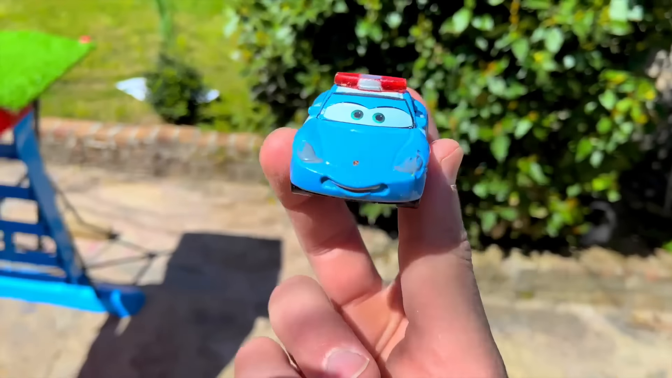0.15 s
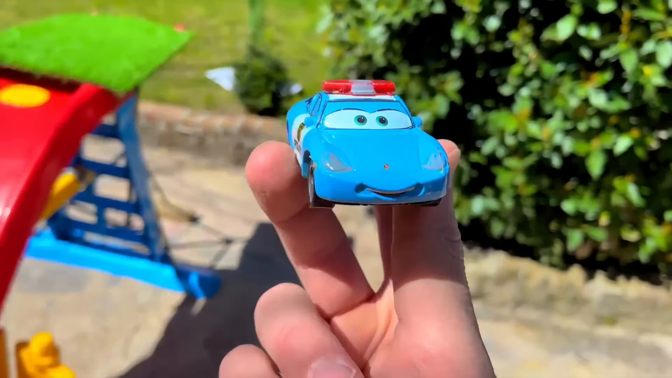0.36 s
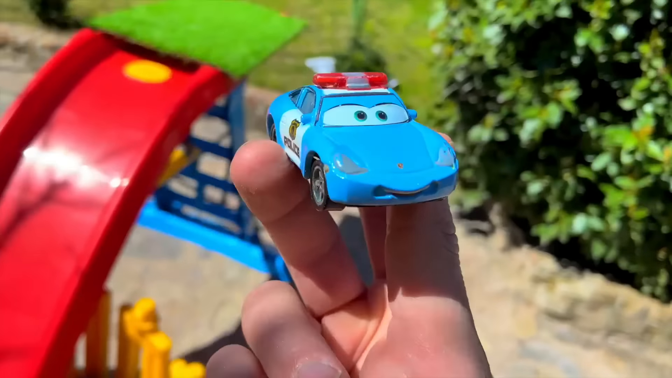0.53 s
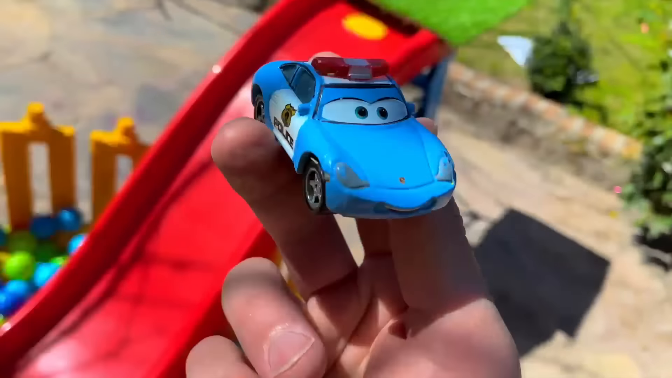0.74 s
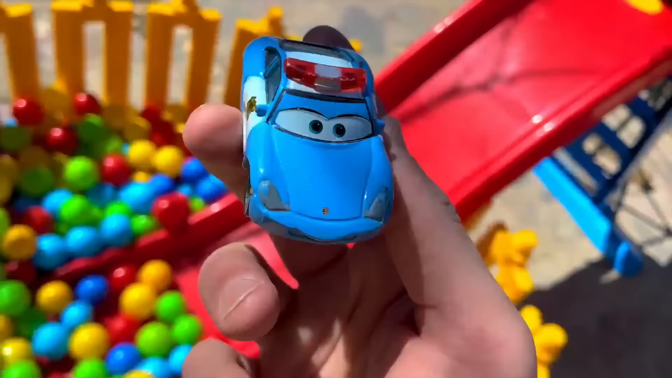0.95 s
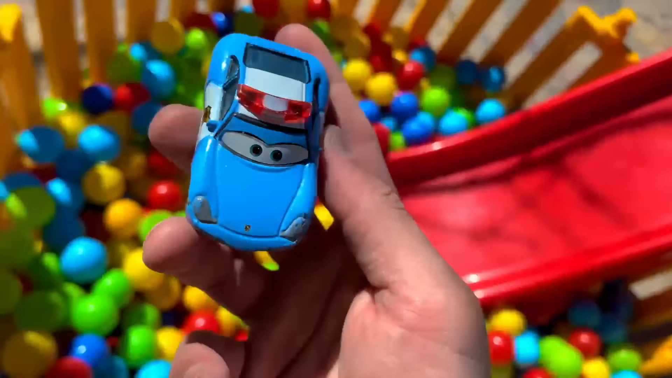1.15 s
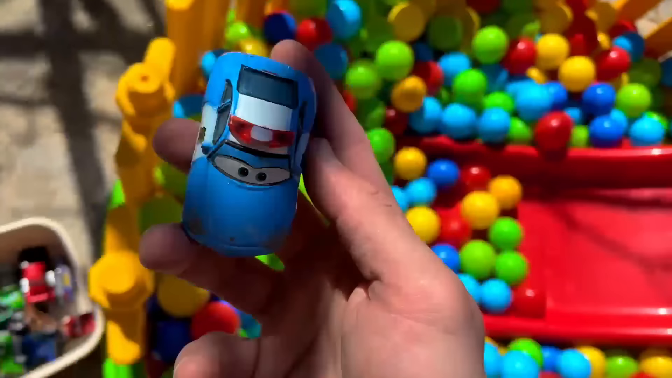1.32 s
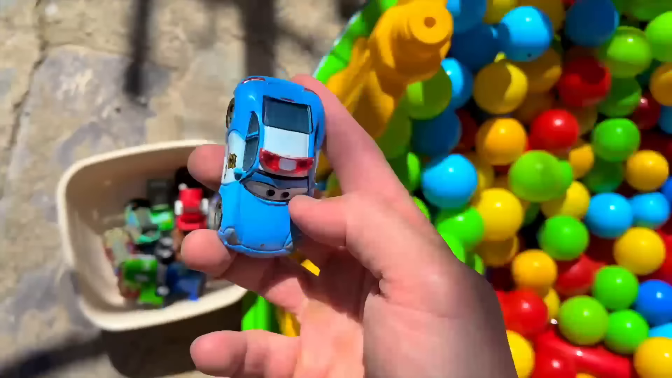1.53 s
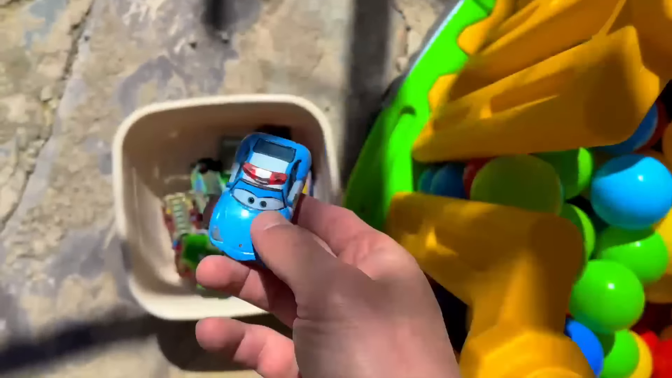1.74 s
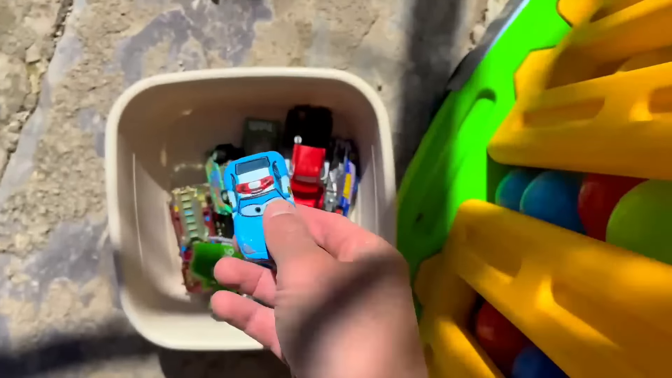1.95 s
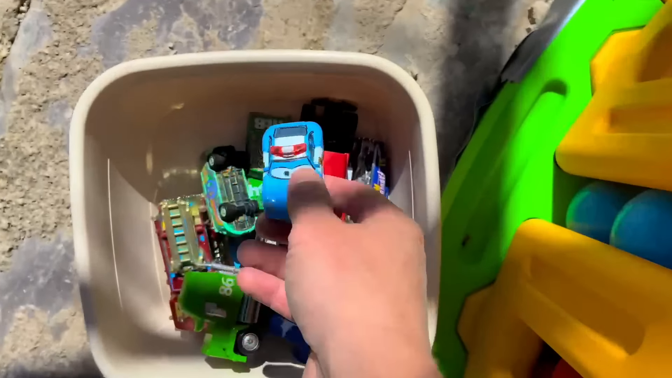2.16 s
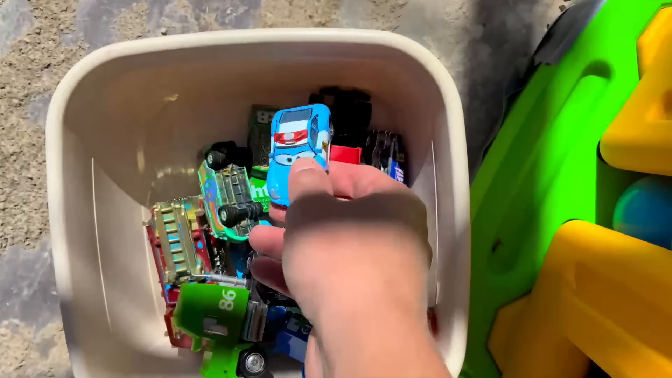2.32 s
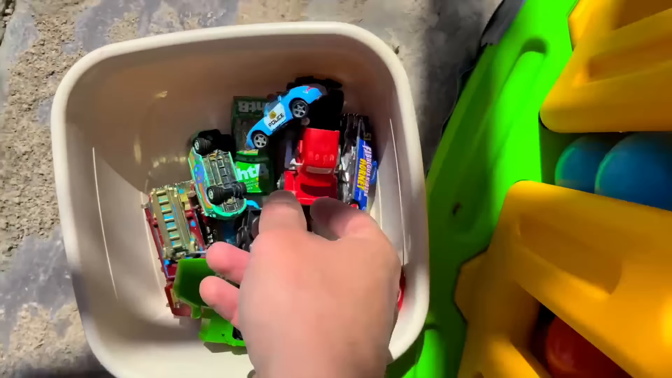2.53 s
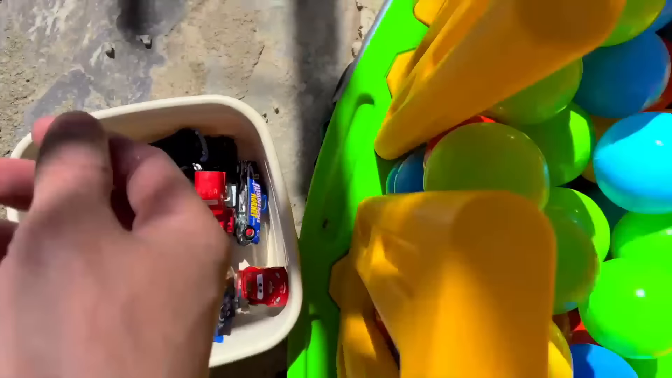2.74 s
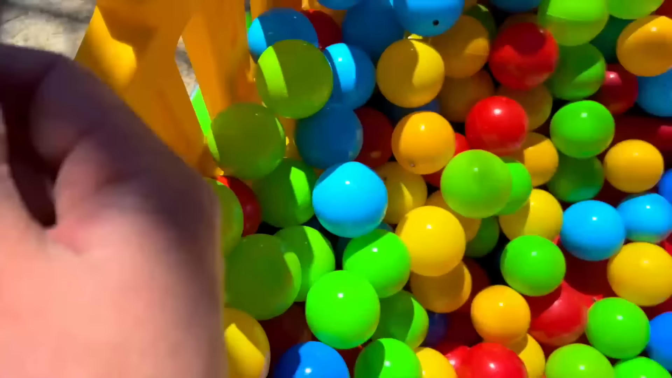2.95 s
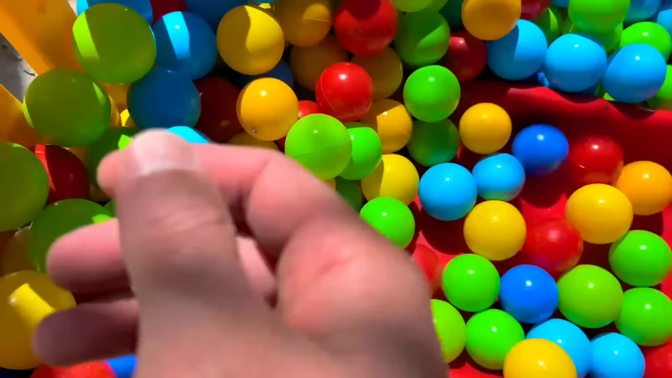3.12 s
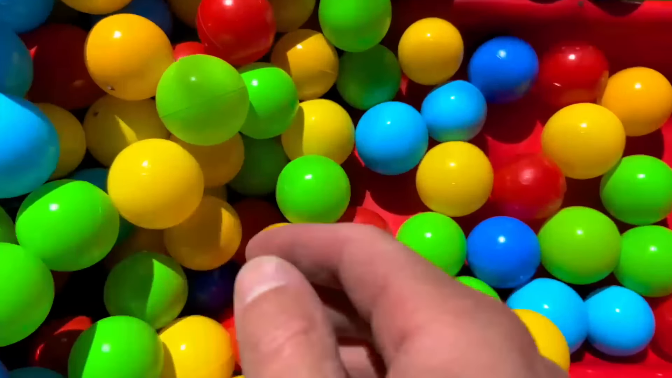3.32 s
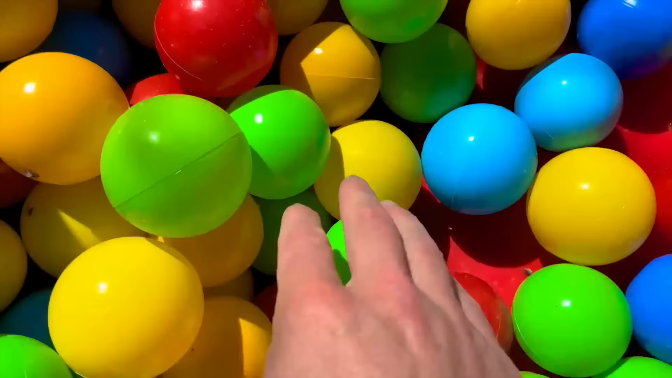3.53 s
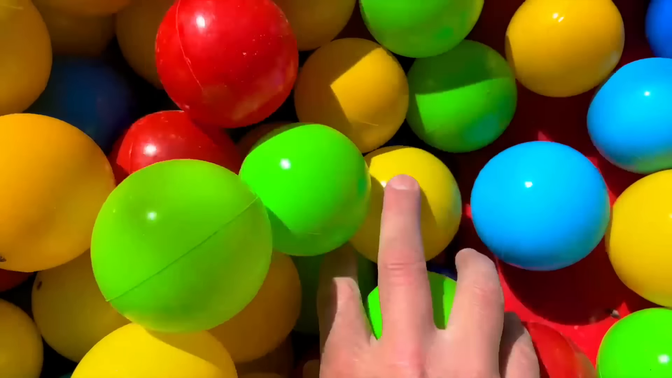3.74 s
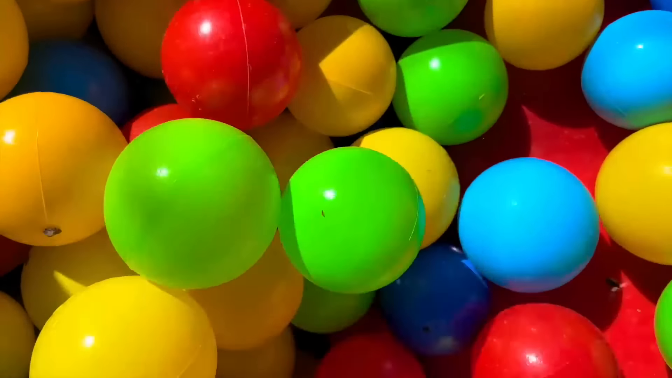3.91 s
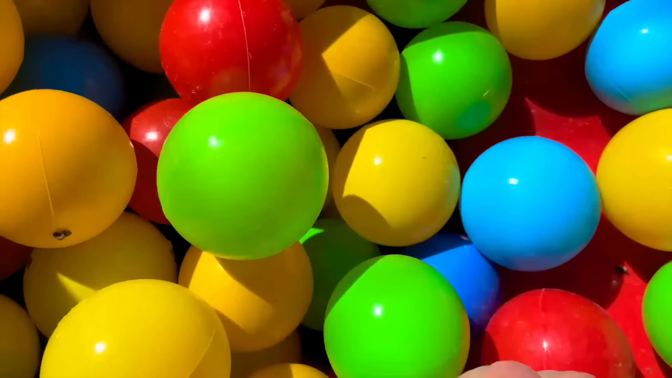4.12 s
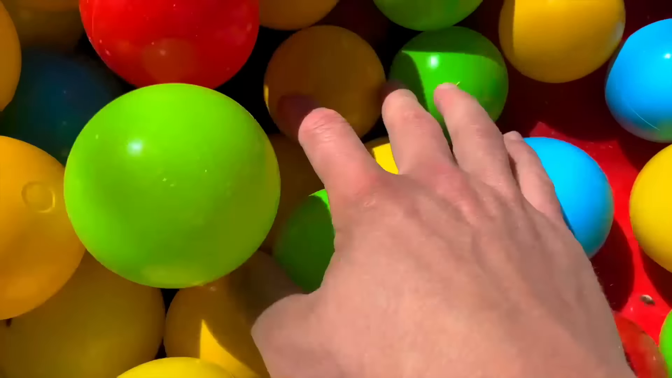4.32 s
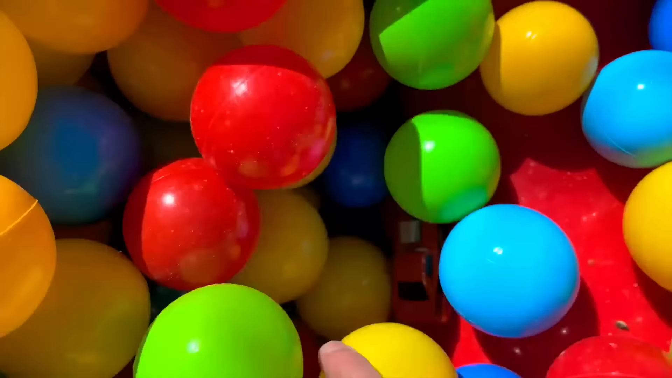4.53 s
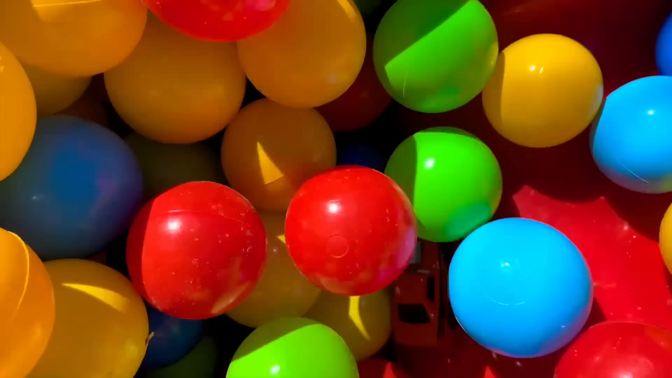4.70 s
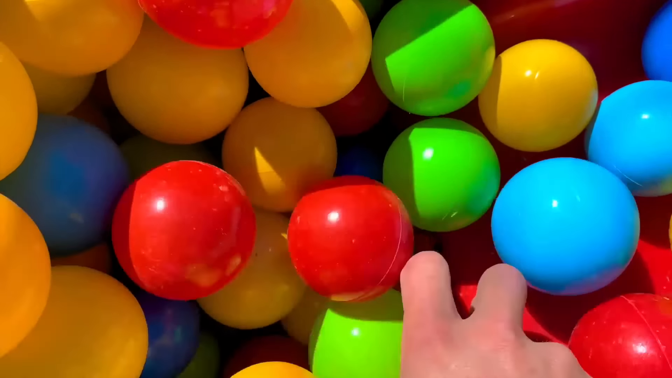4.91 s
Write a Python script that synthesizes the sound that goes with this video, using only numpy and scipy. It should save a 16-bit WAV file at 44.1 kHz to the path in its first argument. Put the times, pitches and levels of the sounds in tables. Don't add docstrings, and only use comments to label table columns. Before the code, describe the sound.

Nearly quiet yard with faint distant hum, wind rumble and light scuffs. Small metal cars click and clatter dryly in a tub for half a second, a hollow plastic panel thuds and shudders, then lightweight balls bump and squeak-rub busily under a hand. Close stereo phone microphones, short dry outdoor reflections, no lasting reverberation.

```python
import sys
import numpy as np
from scipy import signal
from scipy.fft import rfft, irfft, next_fast_len
from scipy.io import wavfile

SR = 44100
rng = np.random.default_rng(int(sys.argv[2]) if len(sys.argv) > 2 else 0)


def wav_out(sig):
    wavfile.write(sys.argv[1], SR, np.round(np.clip(np.atleast_2d(sig).T, -1, 1) * 32767).astype(np.int16))


def ratio_of_db(decibels):
    return 10 ** (np.asarray(decibels, float) / 20)


N = 223542

# (frequency [Hz], level [dB], t60 [s])
CAR_MODES = [(1320, 6.5, 0.06), (1714, 3.5, .045), (2240, 1, 0.081), (2470, -6.5, .035), (2990, -16.5, .04),
             (3284, -14.5, .04), (3662, -6, 0.055), (4044, -14, 0.033), (4500, -18.5, 0.038),
             (4600, -14, .03), (5800, -10.5, .02), (6094, -8.5, 0.055), (6580, -12, .025)]
# (frequency [Hz], level [dB], t60 [s])
TUB_MODES = [(258, 5.5, 0.065), (337, 13.5, 0.019), (474, 2.5, 0.041), (546, 1, 0.062), (620, -3.5, 0.04),
             (750, -14, 0.011), (980, -8, 0.034)]
# (frequency [Hz], density [dB per Hz])
CRACK_SPECTRUM = [(500, -14.5), (900, -16), (2200, -3), (3600, -8.5), (6000, -5), (9000, -5), (13000, -30),
                  (16000, -20.5)]
# (frequency [Hz], density [dB per Hz])
KNOCK_SPECTRUM = [(180, -29), (300, 4.5), (500, -1.5), (921, -5.5), (1320, -7.5), (3060, -16.5),
                  (4500, -42), (9900, -120)]
# (frequency [Hz], density [dB per Hz])
RUB_SPECTRUM = [(1800, -8.5), (3000, -6), (5000, -13.5), (8000, -10.5), (11000, -17.5), (14000, -16),
                (15900, -16.5), (16900, -45)]


def evened(x):
    return x / np.sqrt(np.mean(x ** 2) + 1e-20)


def peaked(x):
    return x / np.max(abs(x))


def read(points, hz):
    f, value = np.transpose(points)
    return np.interp(np.log(hz + 1), np.log(f + 1), value)


def coloured(x, points):
    size = next_fast_len(len(x))
    gain = ratio_of_db(read(points, np.fft.rfftfreq(size, 1 / SR)))
    return irfft(rfft(x, size) * gain, size)[:len(x)]


def add(mix, s, sound):
    part = mix[round(s * SR):][:len(sound)]
    part += sound[:len(part)]


def ring(modes, t):
    return sum(ratio_of_db(db - 60 * t / min(t60, .15)) * np.sin(2 * np.pi * hz * t) for hz, db, t60 in modes)


def sparse(per_s, spread_db):
    size = ratio_of_db(spread_db * np.minimum(rng.exponential(1, N), 4))
    size = size * rng.choice([-1., 1.], N)
    return size * (rng.random(N) < per_s / SR)


def strokes(rows, rise_db, fall_db):
    start, length, *levels = np.transpose(rows)[:, :, None]
    t = np.arange(0, N / SR + .001, .001)
    early = np.maximum(start - t, 0)
    late = np.maximum(t - start - length, 0)
    shape = ratio_of_db(-2 * rise_db * early - 2 * fall_db * late)
    return (np.interp(np.arange(N) / SR, t, np.sqrt((ratio_of_db(2 * db) * shape).sum(0))) for db in levels)


def contact(modes, thud_db, bright_db, t60, draw):
    t = np.arange(draw.shape[1]) / SR
    chatter, hiss, fizz = draw
    blow = np.diff(chatter[:400] * np.exp(-t[:400] / 0.0031), prepend=0, append=0)
    fade = ratio_of_db(-60 * t / t60) * (1 - np.exp(-t / 0.0011))
    clack_spectrum = [(300, -24), (700, -4.5), (1500, -0.5), (3200, -6), (4500, -16.5), (9000, -42.5)]
    tick_spectrum = [(3000, -22.5), (5000, -3.5), (14000, -12.0), (17000, -24.5)]
    metal = peaked(np.convolve(blow, ring(modes, t))[:len(t)])
    thud = peaked(np.convolve(blow, ring(TUB_MODES, t))[:len(t)])
    crack = peaked(coloured(hiss, CRACK_SPECTRUM) * fade)
    clack = peaked(coloured(chatter, clack_spectrum) * fade)
    tick = peaked(coloured(fizz, tick_spectrum) * fade)
    noise = 0.7 * ratio_of_db(thud_db / 2) * clack + 0.48 * ratio_of_db(bright_db / 2) * crack + ratio_of_db(bright_db) * tick
    return 0.95 * metal + noise + ratio_of_db(thud_db - 2) * thud


def cars():
    # (time [s], peak level [dB], ring frequency [Hz], bright tick level [dB], t60 [s])
    hand_ticks = [(0.7498, -47, 1200, -2.5, .03), (0.8123, -48.5, 1380, 5, .03),
                  (.918, -54, 4800, -6, .015), (1.323, -56, 2600, -6, .015), (1.526, -52, 7800, 0, .012),
                  (1.4558, -40, 7200, 0, .018), (1.4677, -42, 4300, -4, .02), (1.472, -38, 2160, -10, .02),
                  (1.478, -48, 6100, -8, .03), (1.545, -33, 6070, -2, .018), (1.5538, -27.5, 2190, 7, .028),
                  (1.652, -46, 2100, -14, .015), (1.6723, -50, 3540, 0, .02), (1.678, -50, 2400, 7, .015),
                  (1.733, -39, 2210, -10, .018), (1.8033, -44, 2280, 2, .018), (2.0188, -45, 4400, 6, .022),
                  (2.15, -42, 2260, -3, .03)]
    # (time [s], peak level [dB], ring frequency [Hz], tub thud level [dB], bright tick level [dB])
    tub_clatter = [(2.2613, -9, 3625, -23.5, -1), (2.285, -29, 2200, -25, 5), (2.296, -36, 2900, -10, -8),
                   (2.303, -31, 2870, -8, -19.5), (2.311, -33, 2950, -2, -18), (2.332, -41, 3000, -8, -18),
                   (2.366, -36, 1630, -10, -4.5), (2.373, -37, 2870, 2, -2),
                   (2.32, -31, 2840, -24.5, -26.5), (2.39, -30, 1650, -15.5, -12),
                   (2.388, -35.5, 3000, -14, -19.5), (2.394, -23, 1700, -21.5, -18),
                   (2.404, -29, 1970, -13, -20), (2.415, -35, 2450, -12, 4), (2.4429, -38, 1720, -10, 7),
                   (2.4725, -27, 2050, -19, -17), (2.477, -29.5, 1650, -14, -20),
                   (2.501, -35.5, 1195, 0.5, -19.5), (2.522, -27, 1720, -14, -13),
                   (2.549, -26, 2960, -13.5, -7), (2.5657, -7, 1714, -21.5, -16),
                   (2.576, -19, 2240, -11.5, -19), (2.583, -16, 1270, -15, -19),
                   (2.592, -24, 2100, -14, -18.5), (2.608, -13, 2250, -6.5, -11), (2.618, -12, 1326, 2, -5),
                   (2.6292, -17, 1300, 1.5, -12), (2.636, -21, 3430, -15, -12.5),
                   (2.644, -21, 1840, -14, -14.5), (2.655, -26.5, 2270, 0, -13),
                   (2.6723, -18, 1970, -6, -14), (2.679, -12, 1290, -2.5, -11), (2.6853, -20, 4200, 3, -5),
                   (2.729, -21, 1746, -4, -16), (2.734, -23, 1550, 4, -31), (2.7994, -24, 2060, 0, -8),
                   (2.7952, -18, 1450, -2, -10)]
    landing_s, landing_db = 2.5558, -2.5
    tick_thud_db = -21
    free_t60_s, jam_per_db = 0.032, .012
    onset_s, soft_per_db = 0.00081, 0.5

    out = np.zeros(N)
    landing = contact(CAR_MODES, -7.0, -20.5, 0.022, rng.standard_normal((3, 4410)))
    add(out, landing_s, ratio_of_db(landing_db) * landing)
    t = np.arange(3000) / SR
    rows = [(s, db, hz, tick_thud_db, bright, t60) for s, db, hz, bright, t60 in hand_ticks]
    rows += [(*row, free_t60_s * np.exp(-jam_per_db * (row[1] + 30))) for row in tub_clatter]
    draws = rng.standard_normal((len(rows), 3, 3000))
    for (s, db, hz, thud_db, bright_db, t60), draw in zip(rows, draws):
        part = [(hz, 0, 1.3 * t60), (1.2 * hz, -11, t60), (0.64 * hz, -9.5, t60),
                (0.82 * hz, -19, .7 * t60), (.88 * hz, -18, .7 * t60), (1.9 * hz, -12, .6 * t60)]
        onset = 1 - np.exp(-t / (onset_s * ratio_of_db(-soft_per_db * bright_db)))
        add(out, s - .001, ratio_of_db(db - 4.0) * contact(part, thud_db, bright_db, t60, draw) * onset)
    return out


def rattle():
    # (start [s], length [s], chatter level [dB], tub hum level [dB], ring frequency [Hz])
    shifts = [(2.26, 0.33, -66, -50, 2500), (2.261, 0.065, -50.5, -44.5, 2900),
              (2.362, 0.018, -52, -51, 1650), (2.394, 0.038, -46, -47.5, 1900),
              (2.438, .09, -61, -52, 2093), (2.555, 0.037, -41, -35, 1800),
              (2.618, 0.013, -22, -20.5, 1800), (2.63, 0.019, -40, -31.5, 2200),
              (2.652, 0.05, -38.5, -38.5, 1600), (2.718, 0.039, -58, -45, 1800),
              (2.798, 0.0079, -40.5, -36, 2000)]
    shifts = np.array(shifts)
    busy, heavy = strokes(shifts[:, :-1], 1499.5, 549.5)
    hz = np.interp(np.arange(N) / SR, *shifts[:, [0, -1]].T)
    grains = sparse(2500, 2.5)
    turn = np.exp(2j * np.pi * np.cumsum(hz) / SR)
    r = np.exp(-np.pi * 250 / SR)
    wander = (turn * signal.lfilter([1 - r], [1, -r], grains / turn)).real
    t = np.arange(3000) / SR
    bodies = signal.oaconvolve(grains, ring(CAR_MODES, t))[:N]
    tub = signal.oaconvolve(np.diff(sparse(540, 3.6), prepend=0), ring(TUB_MODES, t))[:N]
    chatter = evened(coloured(grains, CRACK_SPECTRUM)) + 0.98 * evened(wander) + 0.94 * evened(bodies)
    return ratio_of_db(-8) * busy * chatter + heavy * evened(tub)


def pings():
    # (time [s], peak level [dB], frequency [Hz], t60 [s])
    small_knocks = [(1.1205, -48, 1750, .007), (1.1215, -51, 2700, .006), (1.554, -37, 2100, .016),
                    (2.473, -33, 2050, .016), (2.7995, -30, 4200, .01), (2.2625, -27, 2250, .02),
                    (2.268, -31, 550, .07), (2.328, -38, 550, .04), (2.383, -31, 1620, .012),
                    (2.4035, -28, 2100, .006), (2.408, -32, 1850, .015), (2.43, -37, 550, .04),
                    (2.443, -40, 5200, .012), (2.445, -35, 300, .05), (2.487, -38, 2100, .012),
                    (2.502, -36, 550, .025), (2.608, -14, 2000, .012), (2.608, -24, 3800, .02),
                    (2.617, -22, 6000, .01), (2.619, -14, 700, .025), (2.685, -30, 4200, .035),
                    (2.688, -24, 1400, .03), (2.731, -24, 1300, .018), (2.731, -31, 3100, .012),
                    (2.801, -28, 600, .02), (2.807, -37, 4200, .015), (3.189, -33, 900, .02),
                    (3.211, -33, 450, .03)]
    out, t = np.zeros(N), np.arange(2500) / SR
    for s, db, hz, t60 in small_knocks:
        sound = ring([(hz, 0, t60), (1.13 * hz, -8, t60)], t) * (1 - np.exp(-t / .0012))
        add(out, s - .001, ratio_of_db(db) * peaked(sound))
    return out


def fence():
    # (frequency [Hz], level [dB], t60 [s])
    panel_modes = [(540, 6, 0.035), (824, 1.5, 0.051), (2200, -15, 0.018), (1330, -5, 0.047),
                   (1020, -8.5, 0.032), (1640, -20, 0.026), (1900, -21, 0.02), (2620, -26, 0.014), ]
    bump_s, bump_db = 3.1685, -5.5
    out, t = np.zeros(N), np.arange(6000) / SR
    shudder_spectrum = [(80, -20), (200, -5), (600, 1.5), (1200, -18), (2500, -28.0), (6000, -43.5)]
    slap_spectrum = [(500, -17), (1500, 10), (2600, -3), (4000, -19)]
    shudder = coloured(rng.standard_normal(len(t)), shudder_spectrum)
    slap = coloured(shudder, slap_spectrum) * ratio_of_db(-60 * t / 0.032)
    bump = peaked(ring(panel_modes, t)) + 0.17 * peaked(slap) + 0.11 * peaked(shudder * ratio_of_db(-60 * t / 0.28))
    add(out, bump_s, ratio_of_db(bump_db) * bump * (1 - np.exp(-t / 0.0017)))
    return out


def thump(hz, turns=2.2):
    u = np.arange(round(5 * turns * SR / hz)) * hz / (turns * SR)
    return peaked(u ** 2 * np.exp(-3.2 * u) * np.sin(2 * np.pi * turns * u))


def balls():
    # (start [s], length [s], effort level [dB], skin rub level above the effort [dB])
    stirs = [(3.609, .49, -47, -3.5), (4.127, .07, -48.5, -2), (4.23, .9, -43.5, -4),
             (3.612, 0.068, -40.5, -5), (3.746, 0.07, -40.5, 0), (3.809, 0.078, -28.5, -9.5),
             (3.905, 0.055, -32, -8.5), (4.032, 0.15, -37, -31), (4.241, 0.027, -37.5, -25),
             (4.275, 0.06, -35.5, -2), (4.349, 0.22, -28, -10), (4.589, 0.208, -35.5, -13.5),
             (4.754, 0.046, -29, -15), (4.835, 0.086, -31.5, -14.5), (4.924, 0.029, -28.5, -10),
             (4.992, 0.037, -30, -15.5)]
    # (time [s], peak level [dB], air spring frequency [Hz])
    squeezes = [(3.649, -10.5, 210.5), (3.664, -16, 198), (3.689, -18.5, 207), (3.786, -20.0, 240),
                (3.804, -20, 276), (3.815, -13, 215), (3.822, -7.5, 211), (3.85, -8.5, 228),
                (3.874, -10.5, 276), (3.899, -12, 248), (3.912, -22, 231), (3.933, -14, 196),
                (3.967, -21, 240), (3.983, -6, 217), (4.041, -11.0, 235), (4.076, -9.5, 241),
                (4.106, -17, 255), (4.116, -19, 223), (4.15, -9, 235), (4.166, -22, 220),
                (4.246, -18.5, 207), (4.261, -16.5, 208), (4.277, -21, 219), (4.291, -20, 234),
                (4.316, -19, 242), (4.33, -21, 250), (4.343, -20, 227), (4.358, -12, 221),
                (4.395, -9.5, 204), (4.422, -15.5, 270), (4.435, -21, 253), (4.457, -16.5, 233),
                (4.476, -14, 318), (4.489, -11, 238), (4.502, -11, 221), (4.539, -29, 276),
                (4.551, -16, 211), (4.571, -16, 222), (4.595, -24, 244), (4.611, -14, 190),
                (4.622, -23, 215), (4.64, -20.5, 207), (4.655, -19, 203), (4.712, -17, 228),
                (4.734, -22, 240), (4.748, -14.0, 230), (4.762, -13.5, 246), (4.775, -15.5, 243),
                (4.811, -17, 210), (4.829, -11, 217), (4.841, -13, 215), (4.862, -12.5, 207),
                (4.883, -9, 236), (4.895, -24, 257), (4.923, -7.5, 214), (4.942, -10, 202),
                (4.957, -17, 260), (4.97, -20, 237), (4.992, -14, 246), (5.017, -22, 213)]
    hollow_db, hollow_follows = -7, 0.67

    rows = [(s, length, db, db + rub_db) for s, length, db, rub_db in stirs]
    effort, slide = strokes(rows, 1500, 427)
    flurry = coloured(rng.standard_normal(N), [(5, -6.5), (15, 2), (50, -3.5), (150, -29.0)])
    clumps = ratio_of_db(2.4 * evened(flurry))

    crowd = sum(signal.oaconvolve(sparse(70, 1.3), thump(hz))[:N]
                for hz in (172.4, 193.3, 222, 257, 287.3, 338))
    t = np.arange(1500) / SR
    onset = 1 - np.exp(-t / 0.0013)
    walls = sum(signal.oaconvolve(sparse(80, 3.4), ring([(hz, 0, .022)], t) * onset)[:N]
                for hz in np.geomspace(380, 3400, num=20))
    taps = evened(coloured(walls, [(300, 4.0), (1000, -3.0), (3500, -13.5)]))
    taps = taps + 1.32 * evened(coloured(sparse(3500, 3.6), KNOCK_SPECTRUM))
    rub = coloured(sparse(5000, 1.9), RUB_SPECTRUM)

    out = ratio_of_db(hollow_db) * effort ** hollow_follows * (effort > .003) * evened(crowd)
    out = out + effort * evened(clumps * taps) + slide * ratio_of_db(2.5) * evened(clumps * rub)
    for s, db, hz in squeezes:
        add(out, s - .0015, ratio_of_db(db - 3.5) * thump(hz, turns=1.89))
    return out


def knocks():
    # (time [s], peak level [dB], wall ring frequency [Hz], bright tick level [dB])
    hard_knocks = [(3.605, -24, 913, -13), (3.683, -20, 865, -11), (3.748, -24, 960, -5),
                   (3.779, -23.5, 2100, -4), (3.809, -28, 634, -15), (3.814, -17, 1205, -2),
                   (3.83, -16.5, 1230, -20), (3.854, -27, 970, -18), (3.879, -15.5, 870, -21),
                   (3.922, -22, 596, -13), (3.959, -18, 1810, 0), (3.976, -17, 840, -22),
                   (4.037, -21, 920, -28), (4.053, -20.5, 950, -6.5), (4.085, -20.5, 636, -18),
                   (4.118, -25.5, 2640, 7.5), (4.128, -20, 910, -16), (4.147, -13, 1250, -5.5),
                   (4.233, -22.5, 960, -3), (4.245, -21, 620, 0), (4.252, -17.5, 1070, -11),
                   (4.303, -17, 1240, -20), (4.356, -17, 900, -11), (4.357, -15, 2450, -12),
                   (4.39, -18.5, 2000, -20), (4.413, -19, 1900, -17), (4.462, -18.5, 597, -5),
                   (4.475, -19, 3010, -18), (4.492, -12.5, 1310, -13), (4.503, -13, 1120, -27),
                   (4.53, -18, 2200, -14), (4.549, -17, 2800, -10), (4.555, -23, 1300, -18),
                   (4.606, -21.5, 620, -12), (4.63, -19.5, 1990, -15), (4.642, -27, 1720, -18),
                   (4.689, -27, 580, -20), (4.732, -13, 1125, -9), (4.773, -16, 920, -4.5),
                   (4.834, -32.5, 890, -3), (4.877, -26, 630, -1), (4.879, -16, 1654, -5),
                   (4.918, -21, 600, -5), (4.939, -18, 690, -18), (4.947, -12.5, 970, -4),
                   (4.99, -17, 800, 0.5)]
    out, t = np.zeros(N), np.arange(2000) / SR
    draws = rng.standard_normal((len(hard_knocks), 2, len(t)))
    for (s, db, hz, tick_db), hiss in zip(hard_knocks, draws):
        wall = 0.68 * ring([(hz, 0, .016), (1.17 * hz, -5, .014), (1.604 * hz, -10, .012)], t)
        wall = wall + peaked(coloured(hiss[0], KNOCK_SPECTRUM)) * ratio_of_db(-60 * t / 0.055)
        tick = peaked(coloured(hiss[1], RUB_SPECTRUM)) * ratio_of_db(-60 * t / 0.019)
        sound = (peaked(wall) + ratio_of_db(tick_db + 7.5) * tick) * (1 - np.exp(-t / 0.0013))
        add(out, s - .001, ratio_of_db(db + 1.0) * sound)
    return out


def scuffs():
    # (start [s], length [s], rustle level [dB], dull scrape level [dB])
    scuff_strokes = [(.81, 0.1, -70, -52), (1.36, 0.17, -67, -62.5), (1.56, 0.27, -70, -86),
                     (1.85, .17, -63.5, -64.5), (2.17, 0.037, -68.5, -82), (2.85, .12, -73.5, -66),
                     (3.08, 0.15, -66.5, -63), (3.35, 0.058, -68, -50.5), (3.43, 0.146, -77.5, -70),
                     (1.15, 0.065, -81.5, -84), (3.19, .05, -78, -60), (.86, .065, -76, -59)]
    # (frequency [Hz], density [dB per Hz])
    rustle_spectrum = [(900, -33), (1500, -9.5), (2500, -9), (3500, -20.5), (6500, -15.5), (9000, -15),
                       (13000, -26.5), (16000, -17.5)]
    scrape_spectrum = [(350, -27), (700, 5.0), (1200, 0), (1900, -8.5), (2750, -7), (3600, -15.0), (8000, -34.5)]
    bright, dull = strokes(scuff_strokes, 202, 322)
    rustle = evened(coloured(sparse(10000, 3.5), rustle_spectrum))
    scrape = evened(coloured(sparse(2500, 3), scrape_spectrum))
    return ratio_of_db(6.5) * bright * rustle + dull * scrape


def through_case(clicks):
    return coloured(clicks, [(7000, -20.0), (8500, 0), (9800, -21.5), (11500, -26.0), (14000, -35.5), (15500, -7)])


def reflections(t60, count):
    taps, at = np.zeros(round(t60 * SR)), rng.random(count) * t60
    taps[(at * SR).astype(int)] = rng.choice([-1., 1.], count) * ratio_of_db(-60 * at / t60)
    return taps / np.linalg.norm(taps)


def yard(x):
    turn = np.arange(N) / SR * 7
    parts = (x * np.cos(np.pi * (turn + k) / 3) * np.sqrt(2 / 3) for k in range(3))
    return sum(signal.oaconvolve(part, reflections(.2, count=1500))[:N] for part in parts)


def ports(x):
    # (frequency [Hz], phase [rad])
    port_phase = [(0, 0), (5300, -.5), (6800, .4), (8750, np.pi), (9500, np.pi), (11700, 2 * np.pi),
                  (13000, 2 * np.pi), (14800, 3 * np.pi)]
    # (frequency [Hz], shared part [0-1])
    port_same = [(60, .97), (200, .995), (500, .93), (1500, .9), (4000, .87), (6600, .94), (9000, .97),
                 (12000, .988)]
    # (frequency [Hz], level difference [dB])
    port_balance = [(60, -1), (200, -3), (600, -2.5), (1000, -.5), (2200, 0), (4500, -3), (8000, 0),
                    (16000, 0)]
    # (time [s], level difference [dB])
    pan_path = [(0, 6), (2.2, 0.5), (2.4, -0.5), (2.6, 0.5), (3.1, 4.5), (3.5, 0), (3.7, -1), (5.07, -0.5)]
    hz, t, z = signal.stft(x, SR, nperseg=256, noverlap=192)
    same = np.clip(read(port_same, hz), 0, 1)[:, None]
    random_phase = np.exp(2j * np.pi * rng.random(z.shape[::-1]).T)
    scattered = 1.85 * np.sqrt(1 - same ** 2) * z * random_phase
    pan_db = np.interp(t, *np.transpose(pan_path)) * (hz[:, None] < 7000)
    balance_db = read(port_balance, hz)[:, None] + pan_db
    half = np.exp(.5j * read(port_phase, hz))[:, None] * ratio_of_db(balance_db / 2)
    pair = np.array([same * z * half + scattered, same * z / half - scattered])
    return signal.istft(pair, SR, nperseg=256, noverlap=192)[1][:, :N]


def wind():
    # (time [s], level [dB])
    wind_levels = [(0.0, -53.5), (0.39, -41), (0.54, -38), (0.61, -55), (0.66, -32.5), (0.78, -43.5),
                   (0.97, -37), (1.28, -56), (1.75, -59), (1.81, -50), (2.05, -58), (2.15, -49),
                   (2.51, -53.5), (3.275, -45), (3.33, -32), (3.42, -43), (4.3, -35.5), (5.07, -40)]
    # (frequency [Hz], density [dB per Hz])
    wind_spectrum = [(22, -29.5), (38, -9), (55, 5), (90, 3), (140, -5), (220, -13.5), (350, -25),
                     (1200, -89.5)]
    # (time [s], peak level [dB], centre frequency [Hz])
    gusts = [(0.264, -36, 62.6), (0.62, -43, 201), (0.366, -35.5, 61.5), (0.516, -35.5, 84.4),
             (0.651, -38, 75.5), (0.732, -39, 126), (0.783, -47, 89.5), (0.849, -44, 190),
             (0.922, -47, 191), (0.952, -45, 66.6), (1.012, -47, 106), (1.116, -35.5, 132),
             (2.554, -36.5, 187), (2.63, -21.5, 224), (2.774, -40.5, 125.4), (3.174, -37, 221),
             (3.175, -34, 136), (3.287, -32, 165), (3.314, -27, 92)]
    level_db = np.interp(np.arange(N) / SR, *np.transpose(wind_levels))
    shared, apart = (evened(coloured(v, wind_spectrum)) for v in rng.standard_normal((2, N)))
    buffets = np.zeros(N)
    for s, db, hz in gusts:
        add(buffets, s - .006, ratio_of_db(db + 1.5) * thump(hz, turns=1.65))
    pressure = shared + .27 * np.outer([1, -1], apart)
    lumps = ratio_of_db(level_db - 1) * np.array([[.92], [1.08]]) * pressure
    return lumps + np.outer([.85, 1.1], buffets)


def bird():
    start_s, length_s, level_db = .497, .06, -80
    out, u = np.zeros(N), np.arange(0, 1, 1 / (length_s * SR))
    phase = 2 * np.pi * np.cumsum(np.interp(u, (0, 1), (4350, 4950))) / SR
    add(out, start_s, ratio_of_db(level_db) * np.sin(np.pi * u) * np.sin(phase))
    return out


def hum():
    # (frequency [Hz], density [dB per Hz])
    town_spectrum = [(88, -39), (150, -10), (714, -10.5), (1160, -15.5), (1250, -15.5), (3210, -34.5),
                     (13100, -53), (15000, -54.5)]
    return ratio_of_db(-60) * evened(coloured(rng.standard_normal(N), town_spectrum))


def scene():
    clicks = cars() + knocks()
    near = clicks + pings() + rattle() + fence() + balls() + scuffs()
    airborne = near + ratio_of_db(-15.5) * yard(near) + hum() + bird()
    return ports(airborne) + ratio_of_db(-5.5) * through_case(clicks) + wind()


def roll_off(x):
    return signal.sosfilt(signal.butter(12, 16490, fs=SR, output="sos"), x)


def record(dry):
    edge = signal.firwin(511, 16300, window=("kaiser", 9), fs=SR)
    mix = signal.oaconvolve(dry, edge[None], "same")
    return roll_off(mix)


dry = scene()
out = record(dry)
wav_out(out)
```